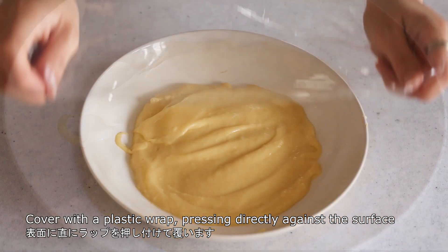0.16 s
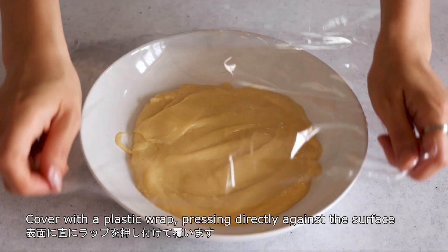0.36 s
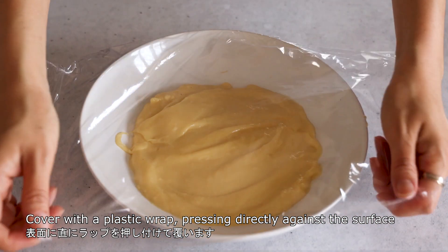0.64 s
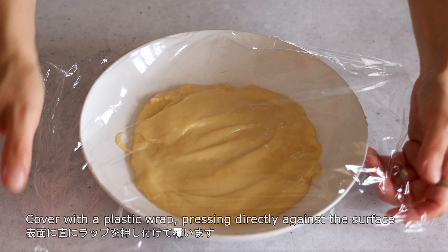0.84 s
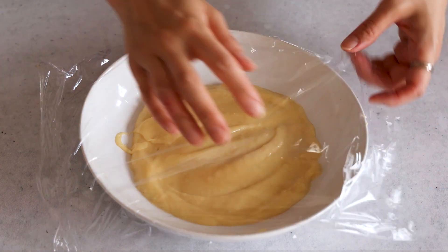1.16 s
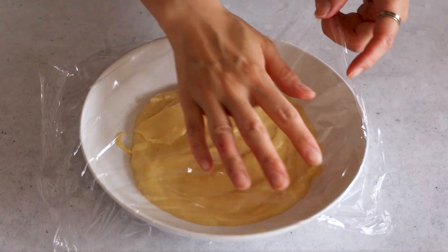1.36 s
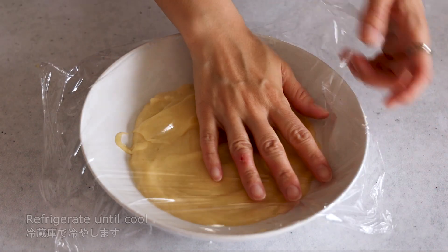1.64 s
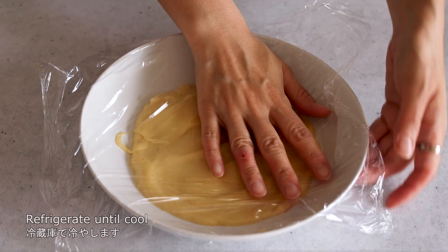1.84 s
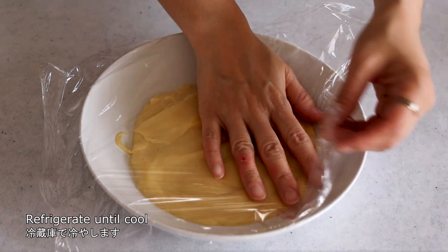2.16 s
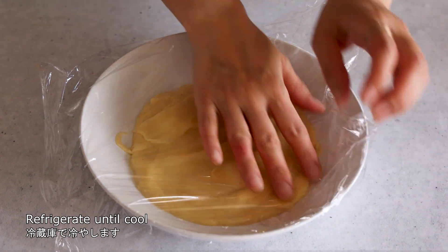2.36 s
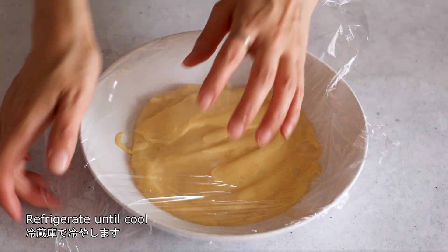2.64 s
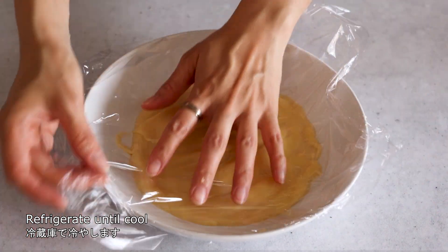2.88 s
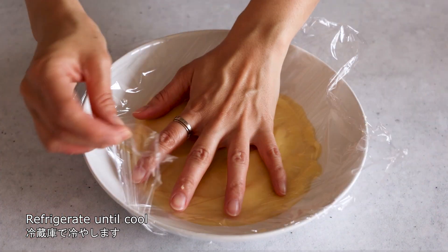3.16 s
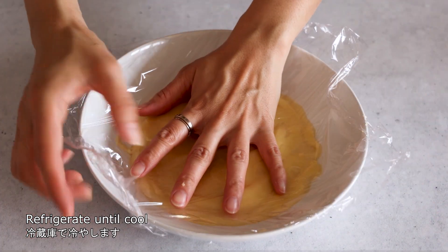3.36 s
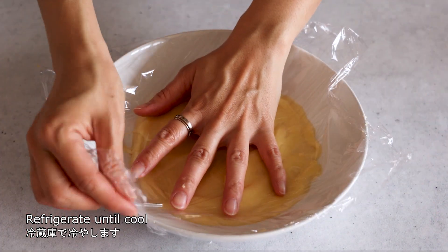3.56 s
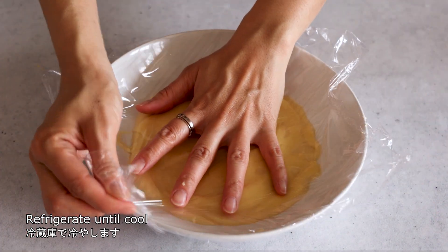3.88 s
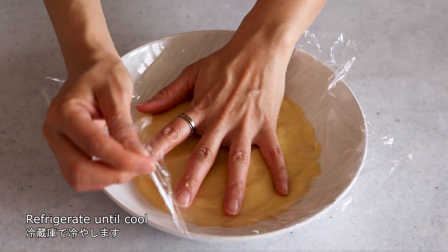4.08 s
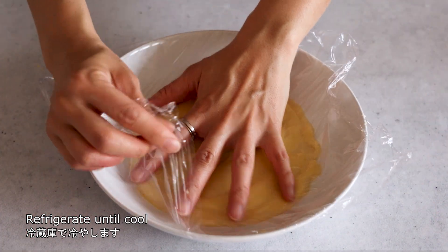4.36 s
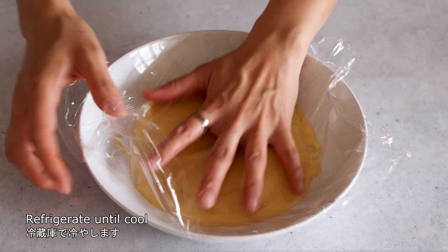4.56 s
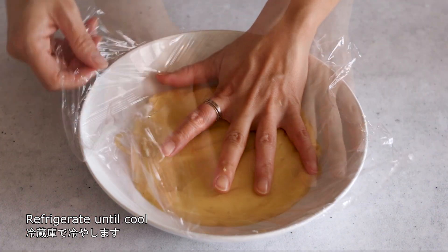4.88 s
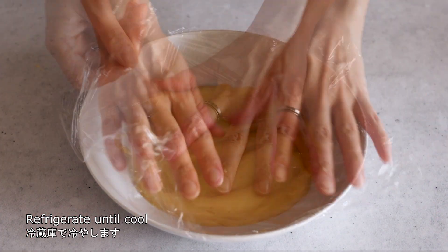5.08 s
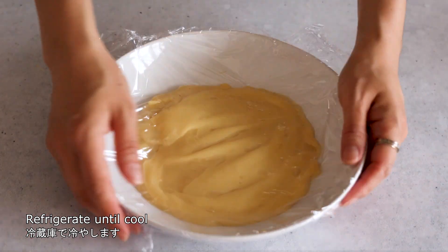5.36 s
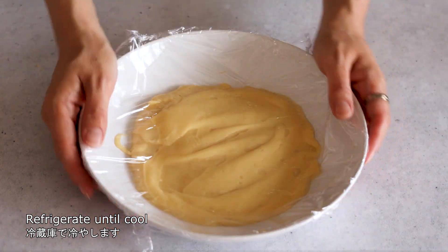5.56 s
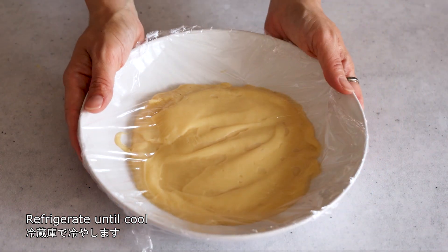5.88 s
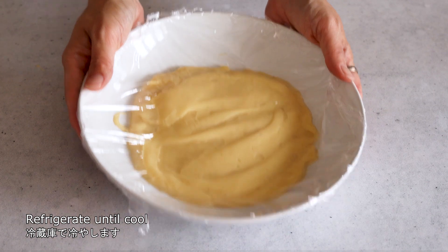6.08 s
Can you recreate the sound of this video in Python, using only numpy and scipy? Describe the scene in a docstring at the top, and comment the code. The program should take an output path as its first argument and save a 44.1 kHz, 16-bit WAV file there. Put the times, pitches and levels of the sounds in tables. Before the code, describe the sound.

Cling film crinkles and snaps close up as hands stretch and press it over a china bowl, ending with a smooth rim slide.

```python
"""Cling film, the main source, is stretched over a china bowl on a kitchen counter and pressed down by hand.
Close and straight ahead of the microphone, creases buckle as swarms of tiny clicks; stuck folds snap as noise
bursts with a short ring, and the bowl pings through a set of decaying modes when touched.
At the end the hands slide round the rim with an even hiss of dense tiny slips. Behind it lie counter echoes,
the kitchen's reverberation, a central, noise-made room tone and a faint, wide microphone hiss."""
import sys
import numpy as np
from scipy import signal
from scipy.fft import rfft, irfft
from scipy.io import wavfile
from scipy.ndimage import uniform_filter1d

SR = 44100
rng = np.random.default_rng(int(sys.argv[2]) if len(sys.argv) > 2 else 0)


def store_pcm(level_fs):
    """Save levels as 16-bit WAV."""
    pcm = np.round(np.clip(level_fs, -1, 1) * 32767).astype(np.int16)
    wavfile.write(sys.argv[1], SR, np.atleast_2d(pcm).T)


N = 274743
TIME = np.arange(N) / SR
CUTOFF_HZ = 16000

# Tugs and presses on the film; slack film sounds low, tight creases crisp:
# (peak t/s, level/dB, build-up/s, easing/s, lows against middle/dB, highs against middle/dB)
FILM_PULLS = [(0.423, -56.5, 0.038, 0.054, 3.5, -2), (0.584, -55.5, 0.018, 0.024, -3, -0.5),
              (0.765, -58, 0.23, 0.28, -1, 3), (1.02, -60.5, .04, 0.035, -2.5, -17),
              (1.074, -57.5, .02, 0.015, 5, 1.5), (1.251, -52, .05, 0.11, -0.5, 2),
              (1.33, -49, 0.11, 0.22, -1, -2), (1.561, -44.5, 0.038, 0.05, -5.5, -1),
              (1.714, -54.5, 0.112, 0.22, -4.5, -1.5), (2.055, -57.5, .04, .07, -8, 1.5),
              (2.15, -42, 0.053, 0.061, 2.5, 2.5), (2.199, -44.5, 0.025, 0.064, 1, 4),
              (2.29, -43.5, 0.06, 0.057, -7, -2), (2.425, -57.5, 0.055, 0.16, -5, 1.5),
              (2.84, -56.5, 0.073, 0.059, 1, -5), (2.98, -47, 0.09, 0.12, 2, 0.5),
              (3.106, -50, 0.25, 0.14, 2, 3.5), (3.421, -54, 0.25, 0.098, -2.5, 0.5),
              (3.668, -38.5, 0.043, 0.046, 2.5, -1), (3.826, -55, 0.21, 0.14, 1, -1.5),
              (3.949, -48.5, 0.14, 0.065, 2, 0.5), (4.034, -33.5, 0.029, 0.11, 0, -4.5),
              (4.078, -41.5, .05, .025, 2, 0), (4.12, -44.5, .015, 0.15, -4.5, -4.5),
              (4.32, -54, 0.22, 0.16, -5, -1), (4.385, -58, 0.044, 0.049, -2, -1),
              (4.531, -57, 0.19, 0.15, -1.5, 3), (4.725, -60.5, 0.13, 0.13, 0.5, -1),
              (4.805, -58, 0.059, 0.25, -2, 1), (4.989, -46.5, 0.11, 0.12, 4, 0.5),
              (5.1, -46.5, 0.13, 0.14, -0.5, -2.5)]
PULL_RANGE_DB = 22  # gained over a build-up, lost again over an easing
BUILD_SHAPE, EASE_SHAPE = 1.245, 1.02  # one is a straight line in dB; more rounds the peak
# Colour of the crinkling film: (f/Hz, level per Hz/dB)
FILM_COLOUR = [(59, -44), (100, -14.5), (535, -11), (1150, -2.5), (1480, -7), (2370, -10), (2580, -8),
               (3250, -8), (5420, -11.5), (6990, -10.5), (14700, -26), (16000, -10)]
# Folds letting go: (t/s, ring f/Hz, flutter before stretching/s, low level/dB, middle level/dB, high level/dB)
FOLD_SNAPS = [(0.6695, 4970, 0.00038, -74, -60, -67), (1.253, 1530, 0.00058, -50.5, -54, -52),
              (1.3116, 1800, 0.00033, -36, -32.5, -35.5), (1.339, 2800, 0.00078, -61, -49, -45),
              (1.5497, 2760, 0.0031, -46, -43, -55), (1.597, 2650, 0.00048, -57, -45, -52),
              (1.6605, 4500, 0.00041, -78, -54, -56), (1.704, 2340, 0.00089, -53, -50, -49),
              (1.835, 3070, 0.001, -59, -55.5, -54.5), (2.1845, 7800, 0.0016, -43, -44, -41.5),
              (2.2784, 4840, 0.0022, -43, -44, -46), (2.2867, 5800, 0.00088, -37.5, -36, -39),
              (2.474, 8300, 0.00044, -64, -62, -49.5), (2.9768, 1240, 0.0029, -40, -40.5, -45.5),
              (3.0083, 1120, 0.00098, -44.5, -45, -67), (3.055, 6200, 0.0014, -54, -44, -43.5),
              (3.102, 1160, 0.0015, -42, -41, -49), (3.423, 1130, 0.001, -47.5, -55.5, -63),
              (3.15, 1070, 0.0014, -51, -60, -66), (3.648, 915, 0.0019, -38, -44, -50),
              (3.664, 3560, 0.00098, -37.5, -35, -48), (3.7, 1160, 0.002, -44, -57, -66),
              (3.733, 1480, 0.00058, -39, -40, -46), (3.7356, 1340, 0.0013, -35.5, -42.5, -51),
              (3.9457, 4350, 0.00062, -37.5, -36.5, -45), (4.014, 2170, 0.00072, -35, -30, -32.5),
              (4.018, 1000, 0.00232, -29.5, -28, -55), (4.03, 3770, 0.002, -41, -26, -41),
              (4.038, 8250, 0.0016, -38, -32.5, -26), (4.1076, 7700, 0.00054, -33.5, -28.5, -32),
              (4.189, 5800, 0.00044, -50, -53, -45), (4.196, 1020, 0.0014, -46.5, -48, -51),
              (4.3062, 8800, 0.00029, -49.5, -36, -35), (4.4045, 5230, 0.00043, -75, -59, -49.5),
              (4.6649, 9600, 0.00016, -75, -73, -53), (4.864, 1400, 0.00059, -50, -52.5, -65.5),
              (4.9928, 1330, 0.0014, -37.5, -46, -66), (5.0414, 5300, 0.00079, -49, -52, -47.5),
              (5.0726, 5240, 0.00054, -45, -34, -40.5)]
# The low, middle and high bands of a snap: (lower f/Hz, upper f/Hz)
SNAP_BAND_EDGES = [(620, 1900), (1900, 5500), (5500, 16000)]
# Hands sliding round the rim: (t/s, level before trim/dB)
SLIDE_LEVEL = [(5.2, -63.5), (5.3, -47), (5.38, -51.5), (5.6, -52.5), (5.72, -49.5), (5.9, -57),
               (5.95, -67), (6.05, -76.5)]
# Colour of the sliding: (f/Hz, level per Hz/dB)
SLIDE_COLOUR = [(120, -37), (200, -17), (416, -15.5), (482, -10.5), (777, -11.5), (1230, -3), (2170, -12.5),
                (3830, -8.5), (8120, -13), (14300, -26.5), (16000, -14)]
# Modes of the china bowl: (f/Hz, level/dB, 60 dB decay/s)
BOWL_MODES = [(482, -16, .2), (1214, -2, .18), (1992, -7, .22), (2905, -3, .22), (3912, -2, .14),
              (5035, -6, .17), (6282, -5, .06)]
# Light touches on the bowl: (t/s, strength/dB)
BOWL_TOUCHES = [(0.83, -65), (0.9753, -56.5), (1.14, -61.5)]
# Soft low knocks, most of them falling with fold snaps: (t/s, level/dB)
SOFT_KNOCKS = [(1.302, -57), (1.55, -59), (2.281, -56.5), (2.973, -67), (3.147, -56), (3.428, -57),
               (3.642, -66), (4.03, -51), (4.82, -54.5), (6.041, -60.5)]
# Narrow, bright ticks that carry into the room: (t/s, peak level/dB)
BRIGHT_TICKS = [(1.973, -37.5), (2.796, -27), (2.8205, -39.5)]
# Echoes from counter and cupboards: (delay t/s, level/dB)
NEAR_ECHOES = [(.0021, -18.5), (.0062, -29), (.0085, -21), (0.0257, -33)]
# Reverberation time of the kitchen: (f/Hz, 60 dB decay/s)
REVERB_TIME = [(200, 0.94), (1000, 0.31), (4000, 0.46), (8000, 0.34), (16000, 0.36)]
# Colour of the kitchen background: (f/Hz, level per Hz/dB)
AIR_COLOUR = [(26, 2), (45, 5.5), (271, -2), (624, -6), (925, -8), (2350, -12), (5560, -12), (11100, -18),
              (14500, -16), (16000, -23)]
# Level of the kitchen background: (t/s, level/dB)
AIR_LEVEL_CURVE = [(0, -67.5), (.3, -65.5), (.6, -67), (2.65, -68.5), (6.2, -66.5)]
# Colour of the microphone self noise, which differs between the ears: (f/Hz, level per Hz/dB)
SELF_NOISE_COLOUR = [(50, 2), (250, 1), (1000, -7), (2200, -16.5), (5000, -14), (10000, -6.5), (16000, -5)]


def from_db(db):
    """Decibels to gain."""
    return 10 ** (np.asarray(db) / 20)


def rms_one(x):
    """Scale to unit rms."""
    return x / np.sqrt(np.mean(x ** 2) + 1e-20)


def level_curve(rows):
    """Read a (t/s, level/dB) table sample by sample."""
    s, db = np.transpose(rows)
    return np.interp(TIME, s, db)


def during(rows, fade_s):
    """One while a curve lasts, fading to zero outside it."""
    start, end = rows[0][0], rows[-1][0]
    return np.interp(TIME, [start - fade_s, start, end, end + fade_s], [0, 1, 1, 0])


def at_hz(points, hz):
    """Read a table on a log-frequency axis."""
    f, value = np.transpose(points)
    return np.interp(np.log(hz), np.log(f), value)


def band(x, low, high, order=2):
    """Causal band-pass between two frequencies in Hz."""
    sos = signal.butter(order, [low, min(high, .45 * SR)], "band", fs=SR, output="sos")
    return signal.sosfilt(sos, x + 1e-18)


def half_octaves(low):
    """Bands of about half an octave up to 18 kHz: (lower edge, centre, upper edge)."""
    edges = np.geomspace(low, 18000, int(2 * np.log2(18000 / low)) + 1)
    return zip(edges, np.sqrt(edges[:-1] * edges[1:]), edges[1:])


def drift(rate):
    """Random motion of unit rms, straight lines between `rate` knots a second."""
    knots = rng.standard_normal(8192)
    return rms_one(np.interp(TIME * rate, np.arange(len(knots)), knots))


def ring(x, hz, t60):
    """A two-pole resonance: a unit click starts a decaying sine of height one."""
    radius = from_db(-60 / (t60 * SR))
    angle = 2 * np.pi * hz / SR
    return signal.lfilter([0, np.sin(angle)], [1, -2 * radius * np.cos(angle), radius ** 2], x + 1e-18)


def effort():
    """Each pull swells and eases; the strongest dominates the colour. Gives level, lows and highs in dB."""
    power, lows, highs = 1e-14, 0, 0
    for s, db, build_s, ease_s, low_db, high_db in FILM_PULLS:
        before = np.maximum(s - TIME, 0) / build_s
        after = np.maximum(TIME - s, 0) / ease_s
        away = np.minimum(before ** BUILD_SHAPE + after ** EASE_SHAPE, 10)
        pull = from_db(db - PULL_RANGE_DB * away) ** 2
        power = power + pull
        lows = lows + pull * low_db
        highs = highs + pull * high_db
    return 10 * np.log10(power), lows / power, highs / power


def crinkle(work_db, low_db, high_db, per_s=900, rate_follows=0.42, slack_db=-0.5, crisp_db=1.0,
            level_db=0.0, catch_db=3.0):
    """The harder the film is worked, the more creases buckle each second; it catches and gives unevenly."""
    rate = per_s * from_db(rate_follows * (work_db + 55.5))  # per_s holds at -55.5 dB
    clicks = buckles(rate, spread_db=4.6, friction=.35, even_s=.02)
    sound = film_sound(clicks, FILM_COLOUR, low_db + slack_db, high_db + crisp_db, patchy_db=3.0)
    return from_db(work_db + level_db + catch_db * drift(110)) * sound


def buckles(per_s, spread_db, friction, even_s):
    """Random clicks of very unequal size over a little friction noise, evened to a steady mean power."""
    sizes = from_db(spread_db * np.minimum(rng.exponential(1, N), 4)) * rng.choice([-1, 1], N)
    happens = rng.random(N) < per_s / SR
    clicks = rms_one(sizes * happens) + friction * rng.standard_normal(N)
    window = max(int(even_s * SR), 2)
    power = uniform_filter1d(uniform_filter1d(clicks ** 2, window), window)
    return clicks / np.sqrt(power + 1e-9)


def film_sound(clicks, spectrum, low_db, high_db, patchy_db):
    """Broadband clicks whose bands flicker separately, as each crease favours its own pitches; rms one."""
    out, power = 0, 1e-20
    for k, (low, hz, high) in enumerate(half_octaves(110)):
        lows = at_hz([(1300, 1), (3000, 0)], hz)
        highs = at_hz([(3500, 0), (8000, 1), (16000, 1.3)], hz)
        gain = from_db(at_hz(spectrum, hz) + lows * low_db + highs * high_db)
        flicker = rms_one(from_db(patchy_db * drift(350)))
        # alternate signs between neighbouring bands
        out = out + (-1) ** k * gain * band(clicks * flicker, low, high)
        power = power + gain ** 2 * (high - low)
    # the changing colour leaves the loudness alone
    return rms_one(out / np.sqrt(power))


def snaps(crack=1.7, ring_cycles=12.0, ring_share=0.52, stretch=1.25, top_hz=13000):
    """A fold lets go with a crack and a brief flutter, and the taut patch beside it rings for a few cycles."""
    out, t = np.zeros(N), TIME[:1024]
    soften = signal.butter(2, min(top_hz, CUTOFF_HZ), fs=SR)
    for s, hz, length, *levels in FOLD_SNAPS:
        flutter_s = stretch * max(length, 1e-4)
        envelope = np.exp(-t / flutter_s) * (1 - np.exp(-2 * t / flutter_s))
        burst = rng.standard_normal(len(t)) * envelope
        burst[round(.5 * flutter_s * SR)] += crack * rng.choice([-1, 1])
        patch = rms_one(ring(burst, hz, ring_cycles / hz))
        burst = signal.lfilter(*soften, rms_one(burst) + ring_share * patch)
        parts = [from_db(db) * rms_one(band(burst, *edges, order=3))
                 for edges, db in zip(SNAP_BAND_EDGES, levels)]
        # the levels hold for the first four milliseconds, where nearly all the energy lies
        out[round(s * SR):][:len(t)] += sum(parts) * np.sqrt(.004 / t[-1])
    return out


def billow(work_db, low_hz=55, high_hz=130, level_db=-21, follows=1.52):
    """Pulled hard, the whole sheet flaps and pushes a little air, heard as low noise."""
    strongest_db = work_db.max()
    push_db = strongest_db + follows * (work_db - strongest_db) + level_db
    return from_db(push_db) * rms_one(band(rng.standard_normal(N), low_hz, high_hz))


def slide(level_db=-0.5, rim_db=-12.5, catch_db=1.0):
    """Skin and film slip on the glaze in dense tiny steps, which also keep the bowl faintly ringing."""
    slips = buckles(4000, spread_db=3.5, friction=0.63, even_s=0.014)
    hiss = film_sound(slips, SLIDE_COLOUR, 0, 0, patchy_db=3.0)
    press = from_db(level_curve(SLIDE_LEVEL) + level_db + catch_db * drift(40))
    press = press * during(SLIDE_LEVEL, fade_s=0.016)
    return press * (hiss + from_db(rim_db) * bowl_ring(slips))


def bowl_ring(x):
    """The bowl's modes driven by a continuous force; rms one."""
    return rms_one(sum(from_db(db) * ring(x, hz, t60) for hz, db, t60 in BOWL_MODES))


def touches(level_db=0.0):
    """A fingertip or finger ring taps the rim, each time ringing the modes a little differently."""
    at = [round(s * SR) for s, db in BOWL_TOUCHES]
    touch_db = np.array(BOWL_TOUCHES)[:, 1]
    out = np.zeros(N)
    for hz, mode_db, t60 in BOWL_MODES:
        blows = np.zeros(N)
        blows[at] = from_db(touch_db + level_db + mode_db + rng.standard_normal(len(at)))
        out += ring(blows, hz, t60)
    return out


def soft_knocks(rise_s=0.0083, low_hz=130, high_hz=340):
    """A gradual push gives a rounded knock of low noise with no click; most fall with fold snaps and fill out
    their low end."""
    push = 0
    for s, db in SOFT_KNOCKS:
        age = np.maximum(TIME - s, 0) / rise_s
        push = push + from_db(db) * age * np.exp(1 - np.minimum(age, 20))
    return push * rms_one(band(rng.standard_normal(N), low_hz, high_hz))


def ticks():
    """A very short scrape sets one bright resonance ringing for a moment."""
    out, t = np.zeros(N), TIME[:1024]
    for s, db in BRIGHT_TICKS:
        scrape = band(rng.standard_normal(len(t)) * np.exp(-t / .0009), 2000, 5500)
        tick = rms_one(ring(scrape, 3750, .004)) + .8 * rms_one(scrape)
        out[round(s * SR):][:len(t)] += from_db(db) * tick / np.abs(tick).max()
    return out


def kitchen(x, tail_db=-12.0, build_s=0.0023):
    """A few near echoes, and a diffuse noise tail whose decay time varies with frequency."""
    t = TIME[:SR * 3 // 4]
    white = rng.standard_normal((2, len(t)))
    tail = 0
    for k, (low, hz, high) in enumerate(half_octaves(80)):
        decay = from_db(-60 * t / at_hz(REVERB_TIME, hz))
        # neighbouring bands use separate noises
        tail = tail + band(white[k % 2], low, high) * decay
    tail = tail * (1 - np.exp(-t / build_s))
    response = from_db(tail_db) * tail / np.sqrt(np.sum(tail ** 2))
    for delay, db in NEAR_ECHOES:
        response[round(delay * SR)] += from_db(db)
    return signal.fftconvolve(x, response)[:N]


def room_tone():
    """Low rumble and hiss of the room, straight ahead."""
    return from_db(level_curve(AIR_LEVEL_CURVE)) * steady_noise(AIR_COLOUR)


def self_noise(level_db=-78.0):
    """Faint steady microphone self noise, opposite in sign left and right."""
    return from_db(level_db) * steady_noise(SELF_NOISE_COLOUR) * np.array([[1], [-1]])


def steady_noise(spectrum):
    """Noise of a given colour; rms one."""
    hz = np.maximum(np.arange(N // 2 + 1) * SR / N, 1)
    coloured = rfft(rng.standard_normal(N)) * from_db(at_hz(spectrum, hz))
    return rms_one(irfft(coloured, N))


def scene(sympathy_db=-21.5):
    """All but the self noise is straight ahead; the film tugs at the rim and sets the bowl ringing faintly."""
    work_db, low_db, high_db = effort()
    film = crinkle(work_db, low_db, high_db) + snaps()
    sympathy = from_db(sympathy_db) * np.std(film) * bowl_ring(film)
    bowl = sympathy + touches() + soft_knocks()
    near = film + billow(work_db) + bowl + slide()
    tick = ticks()
    # the ticks reach the room twice as strongly as the close film
    return near + tick + kitchen(near + 2 * tick) + room_tone() + self_noise()


def record(dry):
    """Cuts the deepest rumble below 43 Hz; nothing sounds above 16 kHz."""
    low_cut = signal.butter(6, 43, "high", fs=SR, output="sos")
    top_cut = signal.ellip(12, .1, 80, CUTOFF_HZ, fs=SR, output="sos")
    return signal.sosfilt(top_cut, signal.sosfilt(low_cut, dry))


dry = scene()
out = record(dry)
store_pcm(out)
```